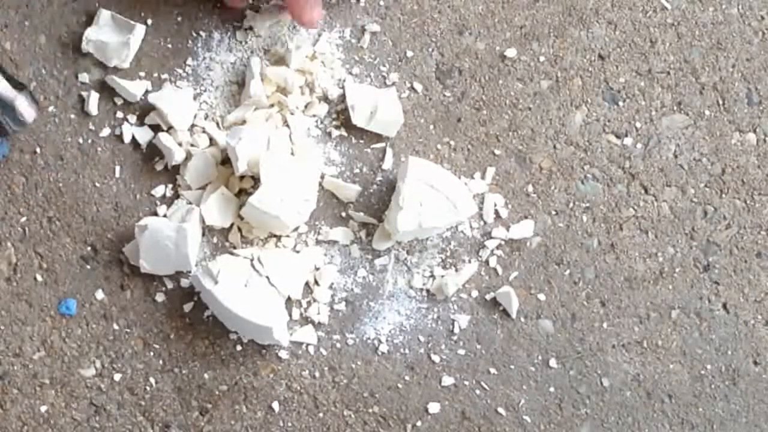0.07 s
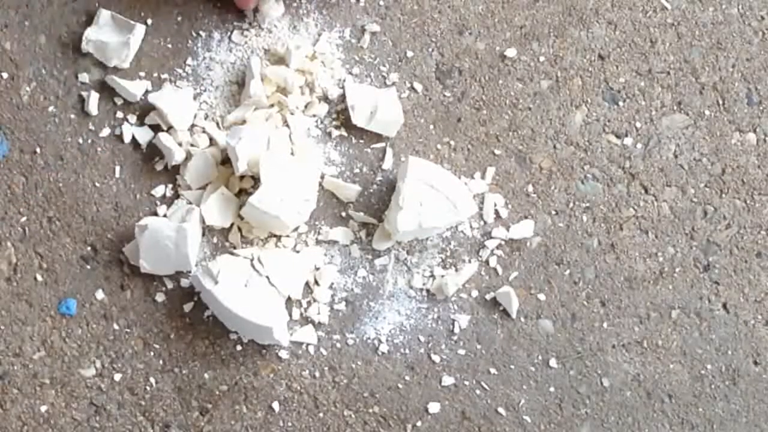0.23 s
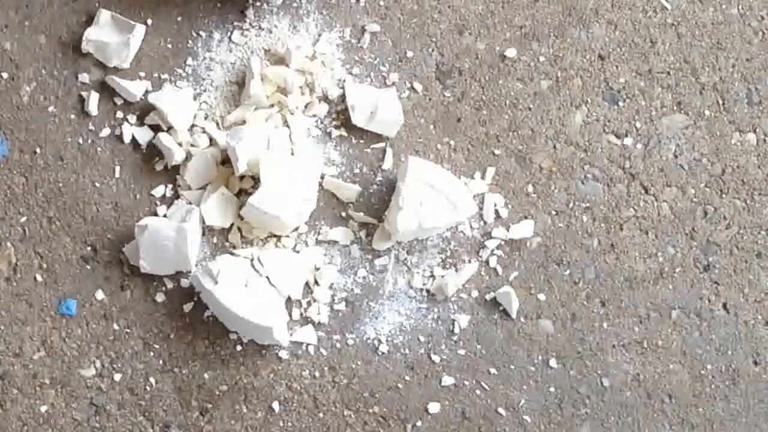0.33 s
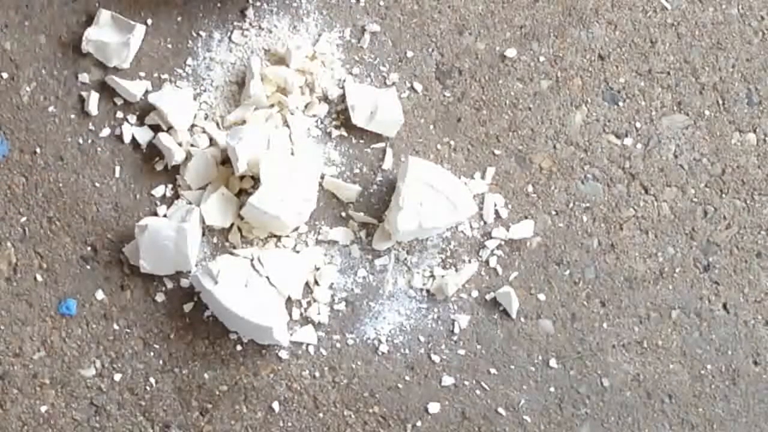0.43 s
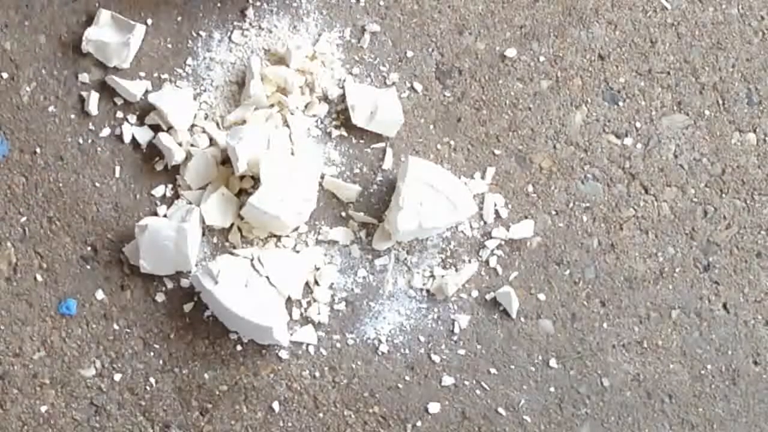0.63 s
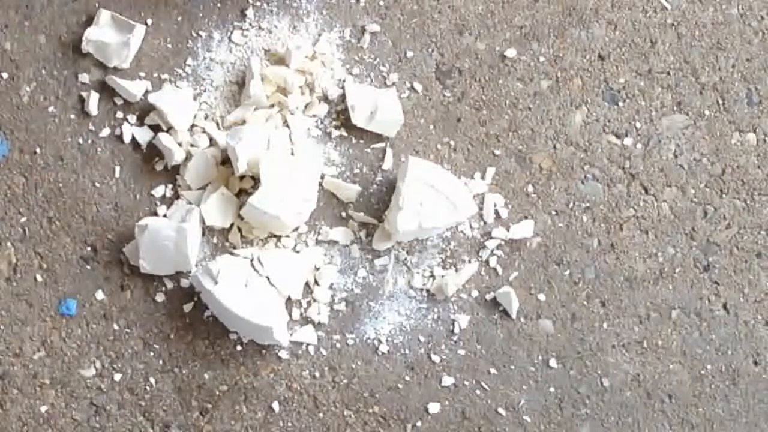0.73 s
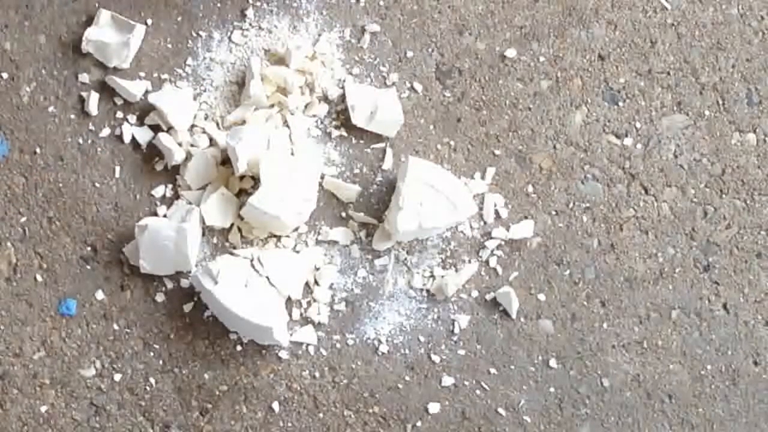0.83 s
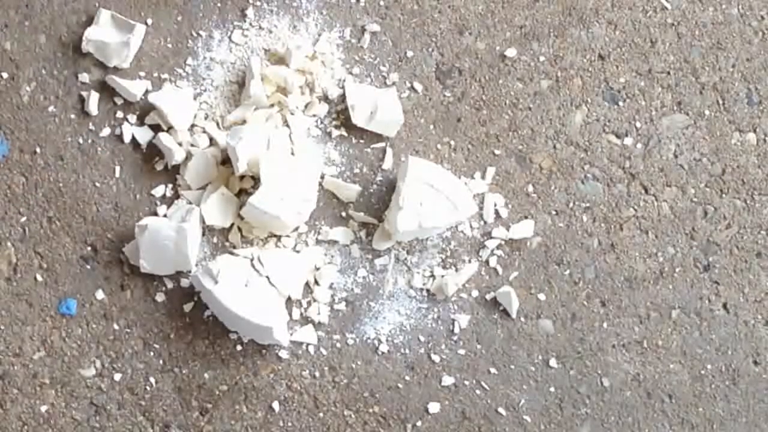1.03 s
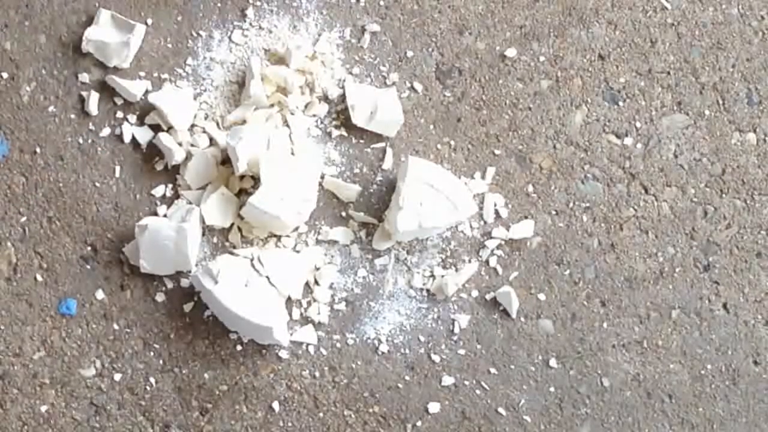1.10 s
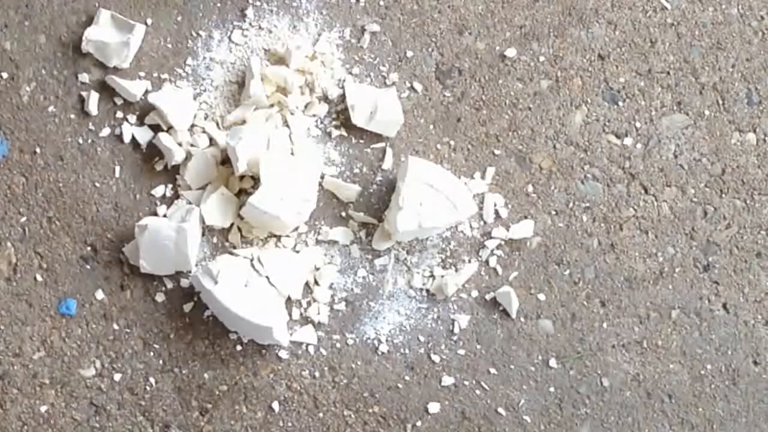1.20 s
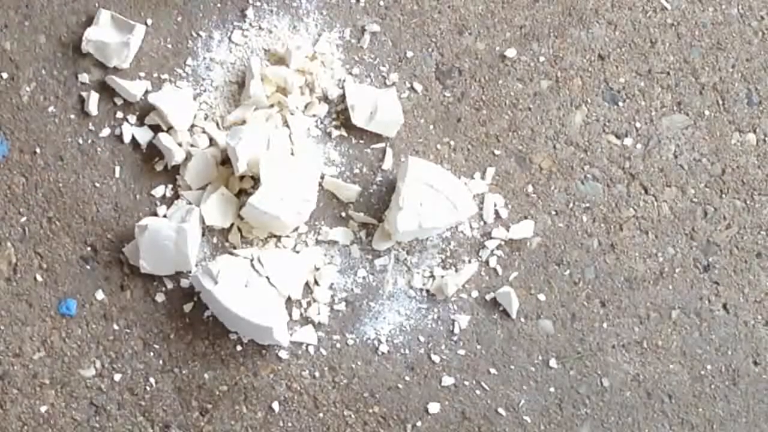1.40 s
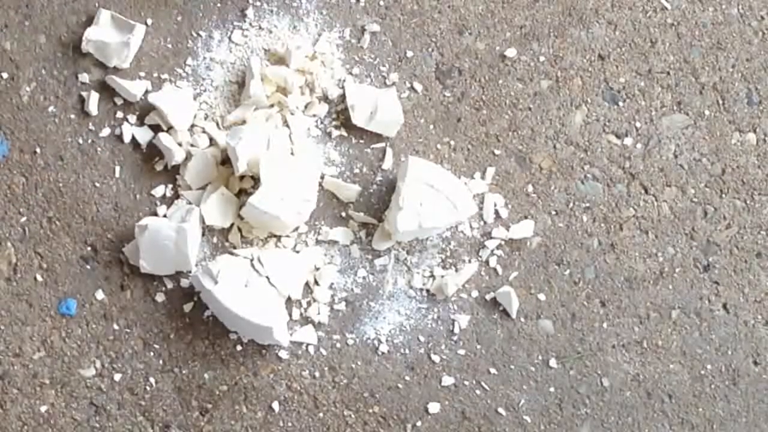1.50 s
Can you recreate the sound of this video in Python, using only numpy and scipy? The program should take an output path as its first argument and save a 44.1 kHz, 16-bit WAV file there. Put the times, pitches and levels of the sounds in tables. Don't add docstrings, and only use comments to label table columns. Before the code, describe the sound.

Hammer set down on a concrete floor: quick metallic clatter, wooden knock, then near quiet

```python
import sys
import numpy as np
from scipy import signal
from scipy.fft import rfft, irfft, next_fast_len
from scipy.io import wavfile
from scipy.ndimage import map_coordinates

SR = 44100
rng = np.random.default_rng(int(sys.argv[2]) if len(sys.argv) > 2 else 0)


def log_audio(samples):
    frames = np.atleast_2d(samples).T
    limited = np.clip(frames, -1, 1)
    pcm = np.round(limited * 32767).astype(np.int16)
    wavfile.write(sys.argv[1], SR, pcm)


def level_to_linear(level):
    exponent = np.asarray(level, float) / 20
    return 10 ** exponent


N = 68355


def hammer():
    # start_s, crack_db, crack_centre_hz, handle_knock_db
    contacts = [
        (0.0865, -35.5, 1036, -38),
        (0.1861, -26.5, 5770, -47.5),
        (0.2181, -36.5, 1300, -46),
        (0.2265, -17.5, 2500, -29),
        (0.2495, -16.5, 1650, -29),
        (.2850, -18.5, 4330, -47),
        (0.307, -34, 4480, -54),
        (0.3247, -33, 3500, -50.5),
        (0.369, -13.5, 2450, -36.5),
        (0.388, -38, 2200, -39),
    ]
    head_rings = [(-69, -62, -50, -48.5), (-46.5, -46.5, -40, -40.5), (-48, -56, -73, -73),
                  (-23.5, -21.5, -27.5, -43), (-39, -32, -35.5, -48), (-43, -21.5, -26.5, -38),
                  (-35, -44, -68, -58), (-35, -56, -50, -54), (-23, -7.5, -22.5, -22.5),
                  (-27.5, -32, -57, -65)]
    regions_hz = [1600, 2900, 4400, 7900]
    # frequency_hz, level_db, t60_s
    head_modes = [(1560, -2.5, 0.14), (1589, -0.5, 0.14), (1648, -32, 0.7), (1966, -6.5, 0.026),
                  (2920, 5, 0.015), (3030, -22.5, 0.081), (3500, -5.5, 0.016), (4470, 0.5, 0.032),
                  (4300, -19.5, 0.24), (5060, 5, 0.0077), (6020, -4.5, 0.032), (6565, -18.5, 0.27),
                  (7925, 5.5, 0.02), (7935, -17.5, .25)]
    # frequency_hz, level_db, t60_s
    handle_modes = [(162.4, -7.5, 0.1), (228.7, -8, 0.085), (545, -0.5, 0.042), (699, -2.5, 0.034),
                    (937, -3, 0.035), (1266, -8, 0.022), (1466, -3.5, 0.044)]
    scatter_db, kept_db, rise_s = 3, -16, 0.0015

    head_hz = np.transpose(head_modes)[0]
    head, knocks = np.zeros(N + SR), np.zeros(N + SR)
    for (start_s, crack_db, centre_hz, knock_db), ring_db in zip(contacts, head_rings):
        head_scatter_db = scatter_db * rng.standard_normal(len(head_modes))
        handle_scatter_db = scatter_db * rng.standard_normal(len(handle_modes))
        head_db = along(np.transpose([regions_hz, ring_db]), head_hz)
        head[round(start_s * SR):] *= level_to_linear(kept_db)
        add(head, start_s, ringing(head_modes, head_db + head_scatter_db, rise_s))
        add(knocks, start_s, level_to_linear(knock_db) * ringing(handle_modes, handle_scatter_db, rise_s))
        add(knocks, start_s, level_to_linear(crack_db) * crack(centre_hz))
    return head[:N], knocks[:N]


def ringing(modes, gains_db, rise_s):
    t = np.arange(SR // 2) / SR
    hz, level_db, t60_s = np.transpose(modes)[:, :, None]
    envelope = level_to_linear(level_db + gains_db[:, None] - 60 * t / t60_s)
    modes_sum = (envelope * np.sin(2 * np.pi * hz * t)).sum(0)
    return modes_sum * (1 - np.exp(-t / rise_s))


def crack(centre_hz):
    rise_s, t60_s, grit, q = 0.00055, 0.041, 0.49, 1
    t = np.arange(SR // 16) / SR
    push = (t / rise_s * np.exp(1 - t / rise_s)) ** 2
    crumbling = 0.32 * level_to_linear(-60 * t / t60_s)
    x = grit * rng.standard_normal(len(t)) * (push + crumbling)
    x[8] += 3
    width_hz = centre_hz / q

    def resonance(hz):
        damping = 1j * hz * width_hz
        return (damping / (centre_hz ** 2 - hz * hz + damping)) ** 2

    x = filtered(x, resonance)
    return x / np.abs(x).max()


def crumbs():
    # start_s, level_db, centre_hz
    ticks = [
        (.846, -53, 2500),
        (0.9865, -46, 2680),
        (1.037, -54, 3500),
        (1.29, -62, 2980),
    ]
    out = np.zeros(N + SR)
    for start_s, level_db, centre_hz in ticks:
        add(out, start_s, level_to_linear(level_db) * crack(centre_hz))
    return out[:N]


def walls(x):
    # frequency_hz, t60_s
    decay_times = [(150, 0.29), (700, 0.3), (1600, 0.43), (3000, .36), (6000, 0.33), (10000, 0.11)]
    delay_s = 0.009
    hz, t, z = signal.stft(rng.standard_normal(SR // 2), SR, nperseg=256)
    decay = level_to_linear(-60 * t / along(decay_times, hz)[:, None])
    tail = signal.istft(z * decay, SR, nperseg=256)[1]
    tail = tail / np.linalg.norm(tail)
    delayed = np.pad(x, (round(delay_s * SR), 0))
    return signal.fftconvolve(delayed, tail)[:N]


def microphone(x):
    thin_hz, dull_hz, dull_power = 128, 7880, 4.5

    def response(hz):
        thinning = (1j * hz / (thin_hz + 1j * hz)) ** 2
        return thinning / np.sqrt(1 + (hz / dull_hz) ** dull_power)

    return filtered(x, response)


def thumps():
    # start_s, level_db, pitch_hz
    blows = [
        (.045, -46, 80),
        (0.598, -48, 94),
        (0.746, -45, 112),
        (0.834, -47.5, 94.3),
        (1.053, -46.5, 91),
        (1.338, -52, 171),
    ]
    t60_s, rise_s = 0.11, 0.0037
    out = np.zeros(N + SR)
    for start_s, level_db, pitch_hz in blows:
        add(out, start_s, ringing([(pitch_hz, level_db, t60_s)], np.zeros(1), rise_s))
    return out[:N]


def rumble():
    # frequency_hz, density_db
    spectrum = [(12, -33), (20, -10), (75, -2), (119, 2), (168, -2), (198, -2.5), (216, -9.5), (400, -17),
                (520, -41), (880, -120)]
    level_db, sway_db = -65, -1.5
    sway = map_coordinates(rng.standard_normal(24), [np.arange(N) * 12 / SR])
    return level_to_linear(level_db + sway_db * sway) * noise(spectrum)


def hiss():
    # frequency_hz, density_db
    spectrum = [(180, -24), (300, 0.5), (544, -5), (646, -4.5), (927, -7), (1290, -9.5), (1710, -8),
                (5710, -9.5), (12700, -15), (16500, -42), (22000, -120)]
    return level_to_linear(-65.5) * noise(spectrum)


def noise(spectrum):
    x = filtered(rng.standard_normal(N), lambda hz: level_to_linear(along(spectrum, hz)))
    return x / x.std()


def filtered(x, response):
    m = next_fast_len(len(x) + 8192)
    hz = np.fft.rfftfreq(m, 1 / SR)
    return irfft(rfft(x, m) * response(hz), m)[:len(x)]


def along(points, hz):
    f, value = np.transpose(points)
    return np.interp(np.log(hz + 1), np.log(f + 1), value)


def add(track, start_s, sound):
    track[round(start_s * SR):][:len(sound)] += sound


def scene():
    walls_db, head_walls_db = -8, -3.5
    head, knocks = hammer()
    knocks = knocks + crumbs()
    reverberant = walls(level_to_linear(head_walls_db) * head + knocks)
    near = head + knocks + level_to_linear(walls_db) * reverberant
    return (microphone(near) + thumps() + rumble() + hiss())[None]


def band_limit(x):
    return signal.sosfilt(signal.butter(12, 12840, fs=SR, output="sos"), x)


def record(dry):
    mix = filtered(dry[0], lambda hz: hz < 12800)[None]
    return band_limit(mix)


dry = scene()
out = record(dry)
log_audio(out)
```